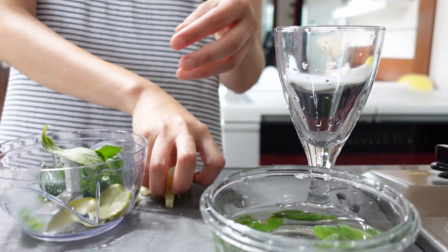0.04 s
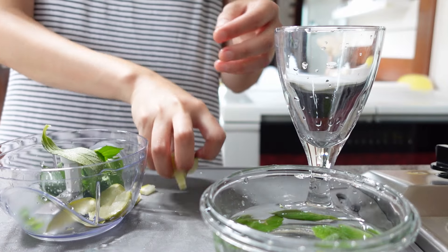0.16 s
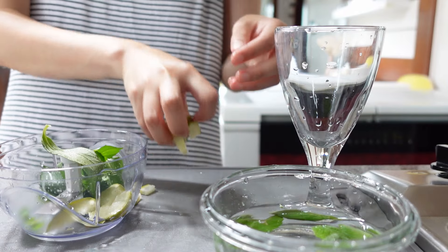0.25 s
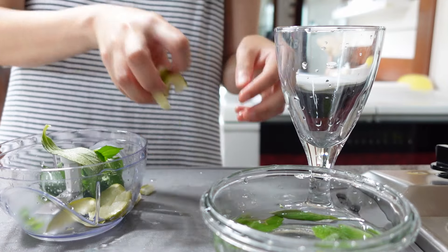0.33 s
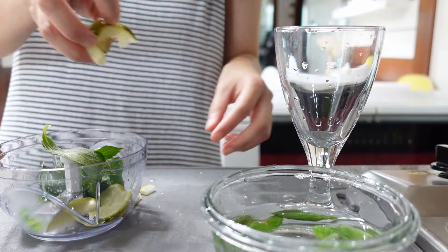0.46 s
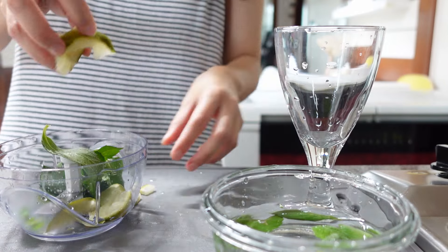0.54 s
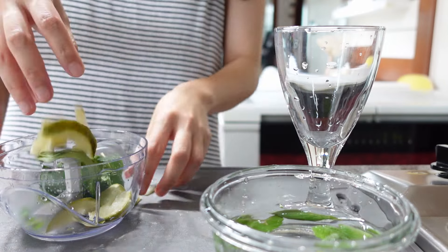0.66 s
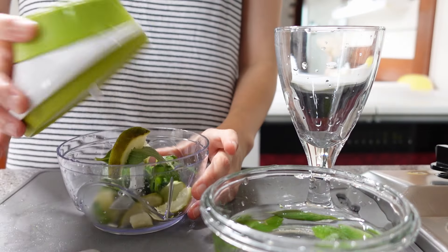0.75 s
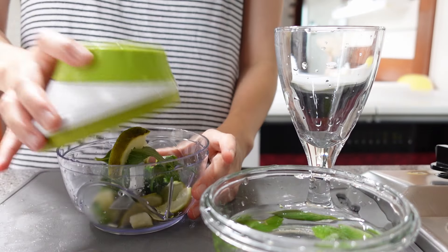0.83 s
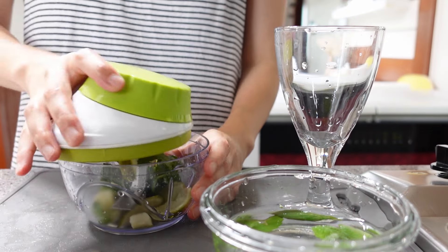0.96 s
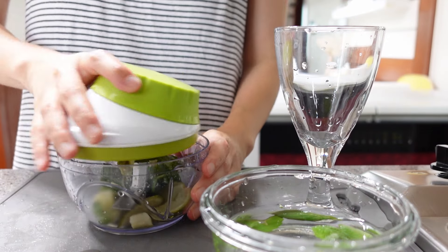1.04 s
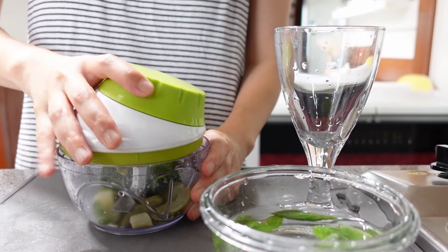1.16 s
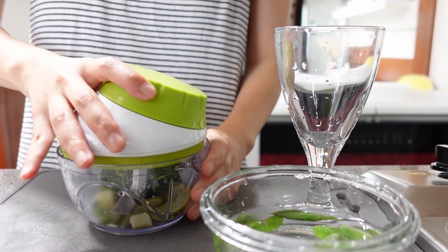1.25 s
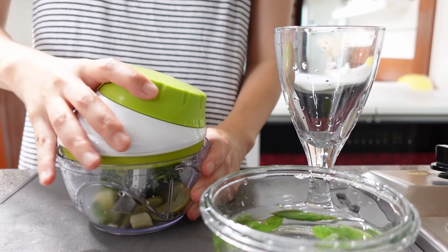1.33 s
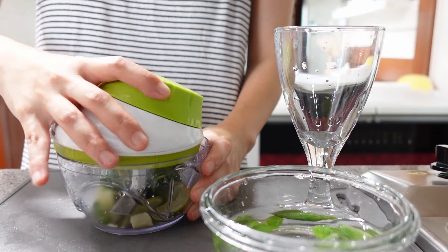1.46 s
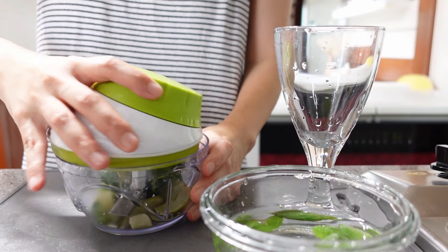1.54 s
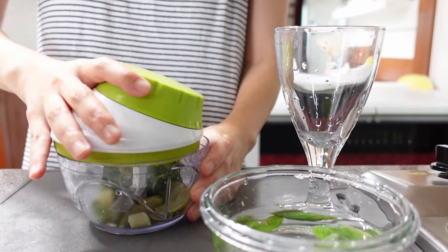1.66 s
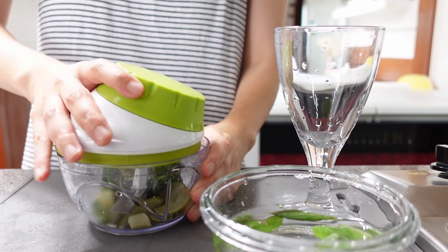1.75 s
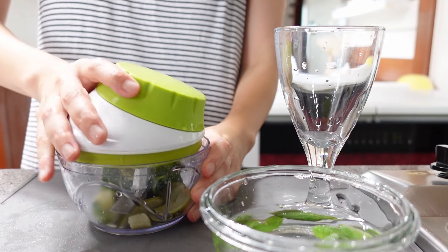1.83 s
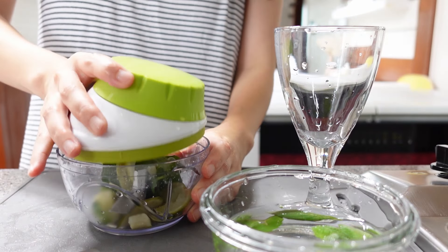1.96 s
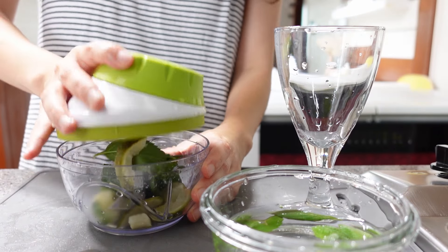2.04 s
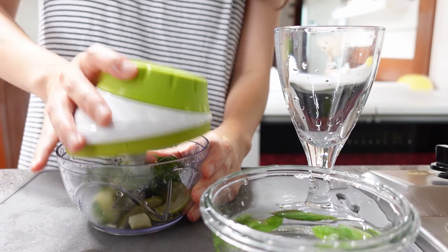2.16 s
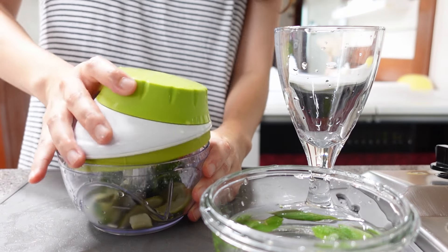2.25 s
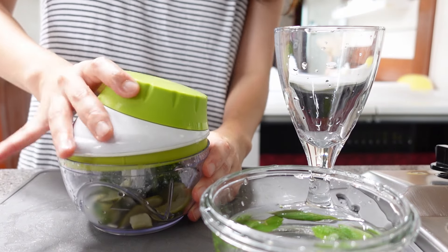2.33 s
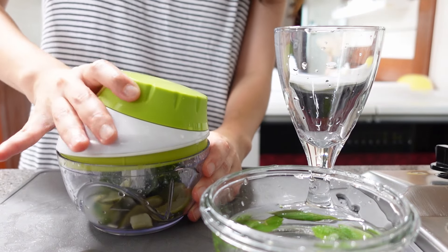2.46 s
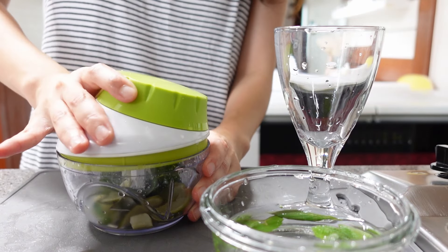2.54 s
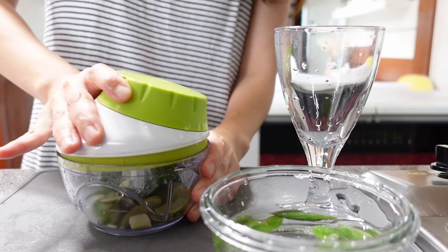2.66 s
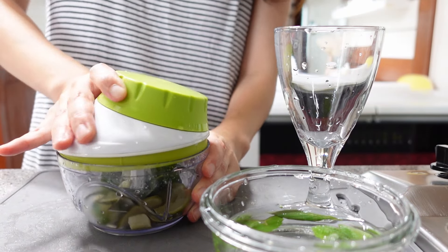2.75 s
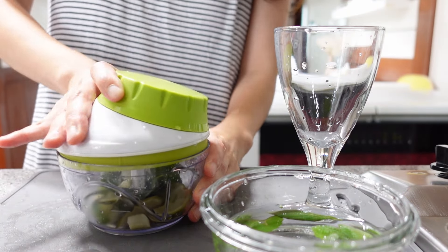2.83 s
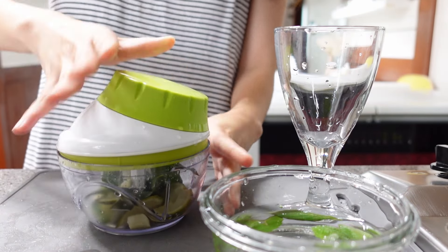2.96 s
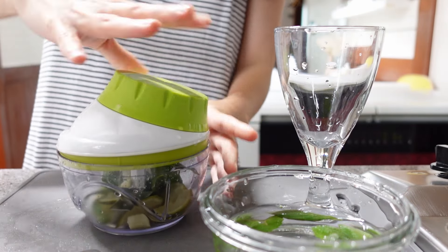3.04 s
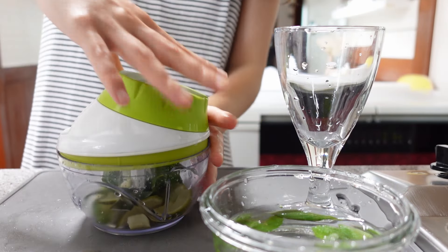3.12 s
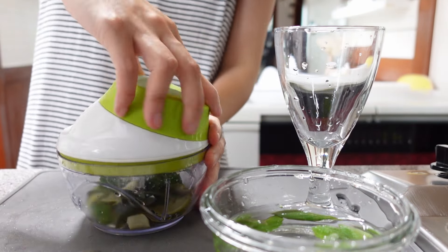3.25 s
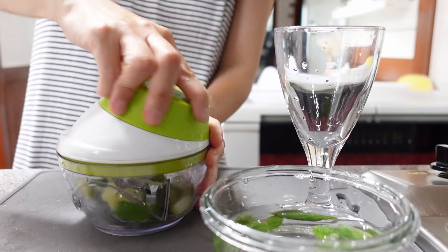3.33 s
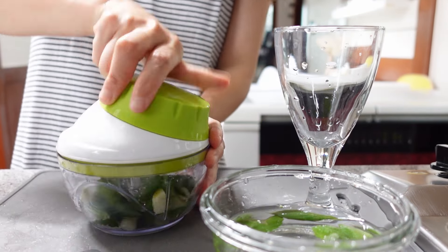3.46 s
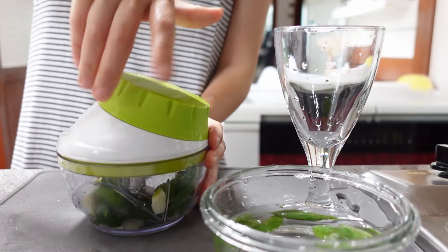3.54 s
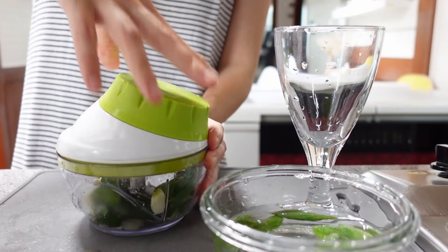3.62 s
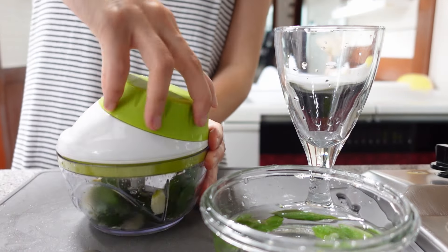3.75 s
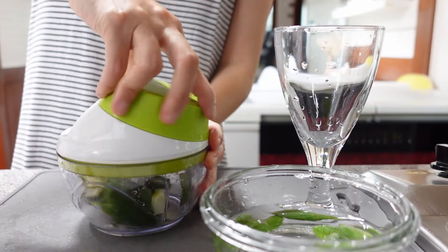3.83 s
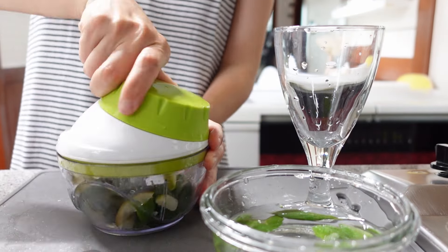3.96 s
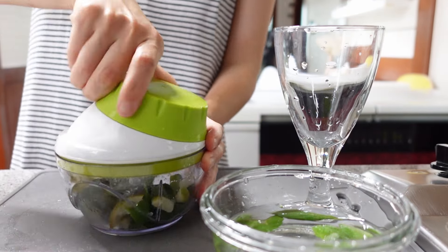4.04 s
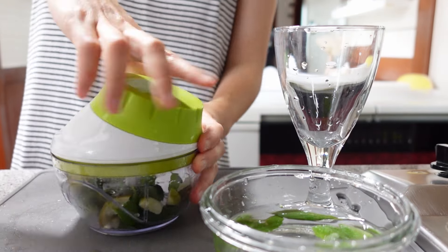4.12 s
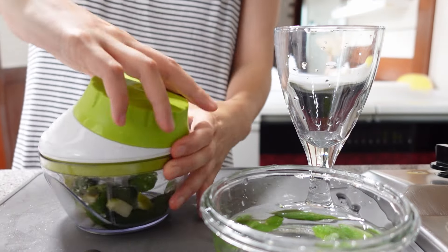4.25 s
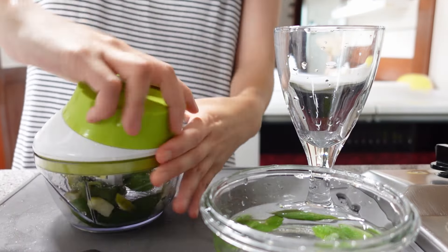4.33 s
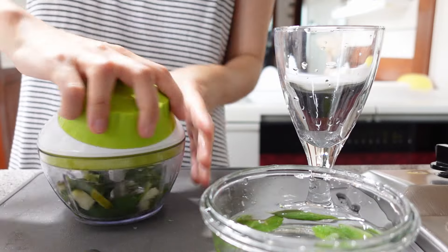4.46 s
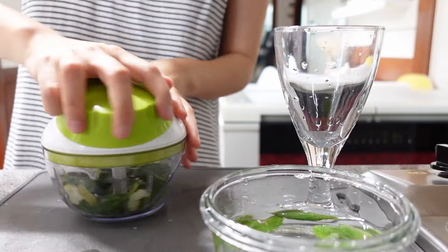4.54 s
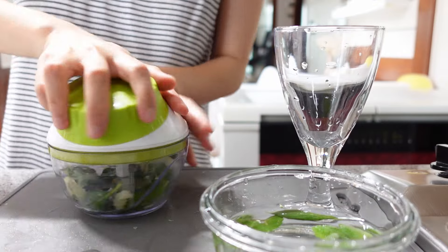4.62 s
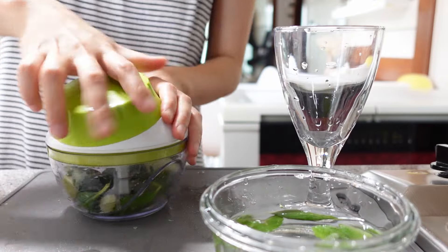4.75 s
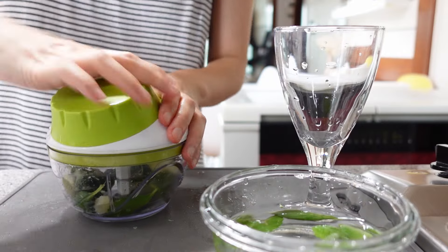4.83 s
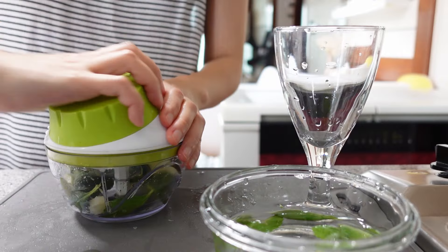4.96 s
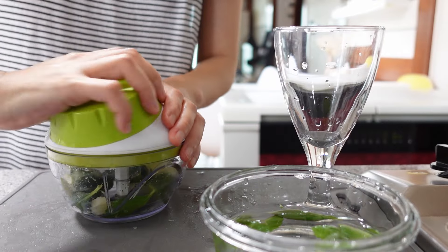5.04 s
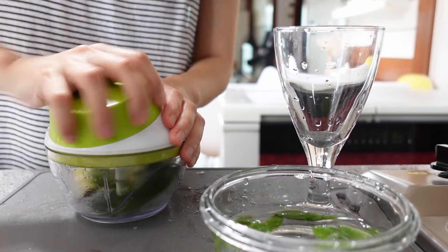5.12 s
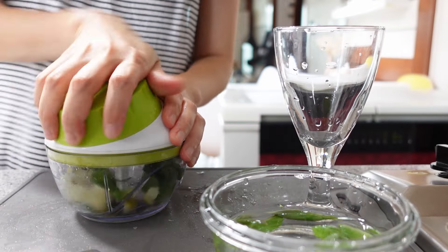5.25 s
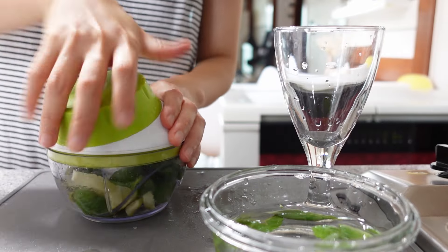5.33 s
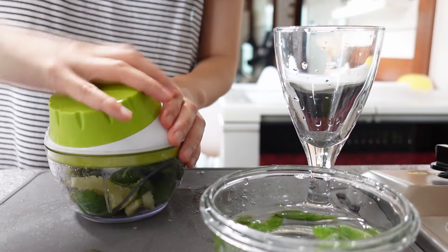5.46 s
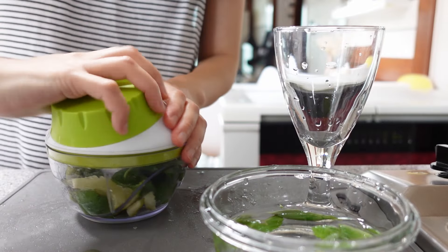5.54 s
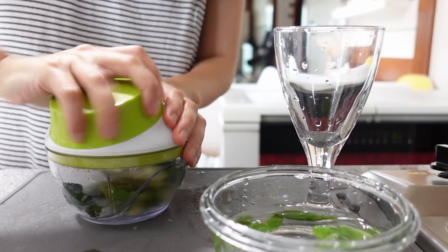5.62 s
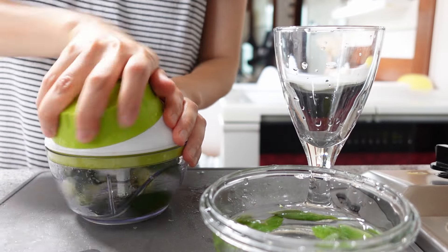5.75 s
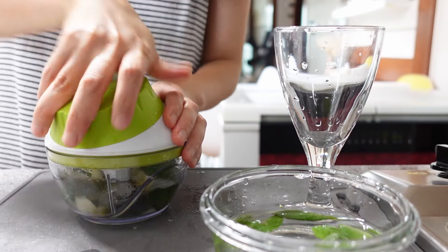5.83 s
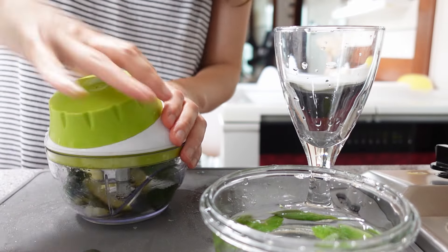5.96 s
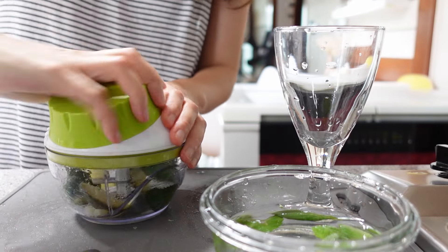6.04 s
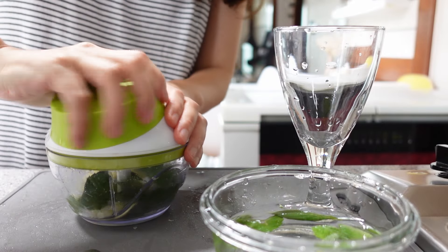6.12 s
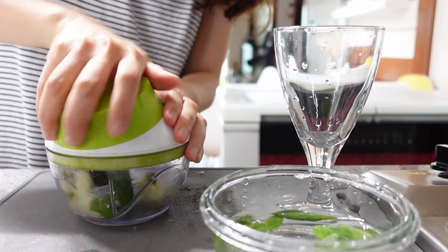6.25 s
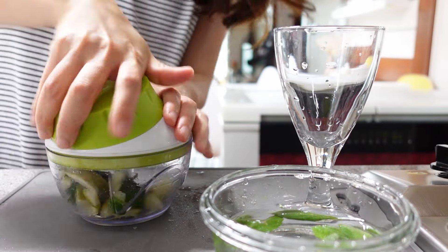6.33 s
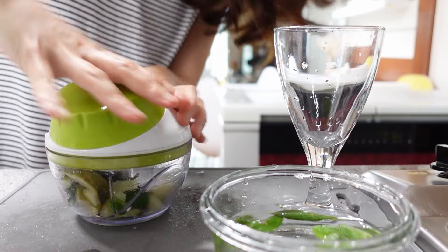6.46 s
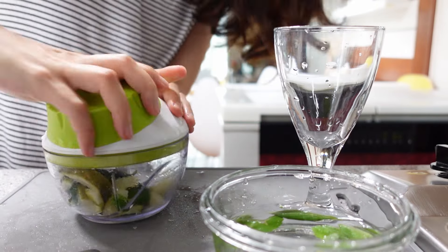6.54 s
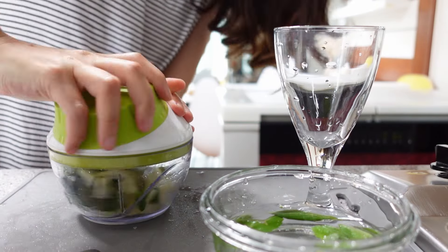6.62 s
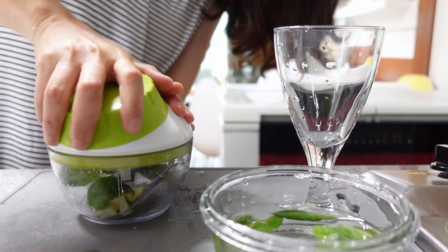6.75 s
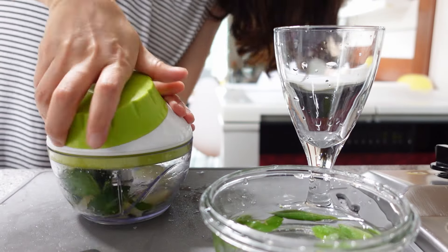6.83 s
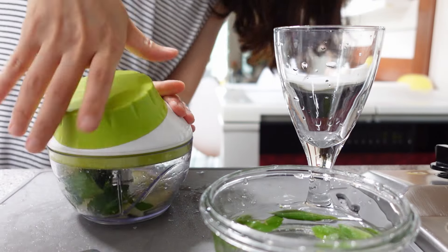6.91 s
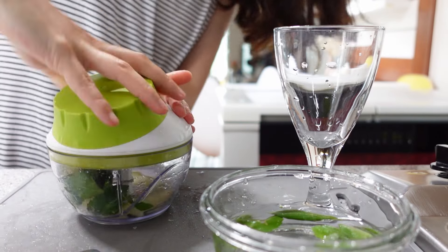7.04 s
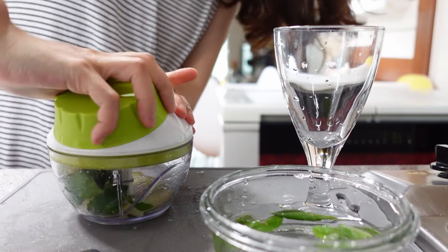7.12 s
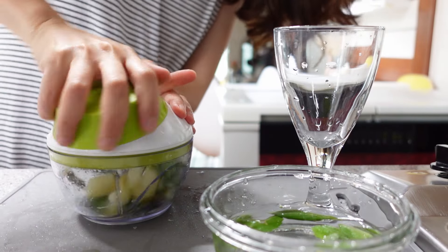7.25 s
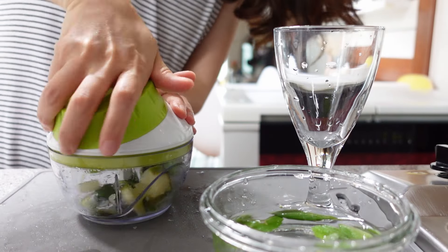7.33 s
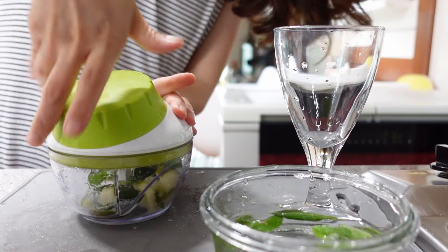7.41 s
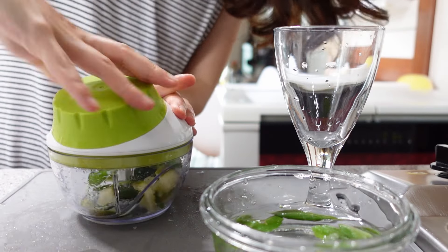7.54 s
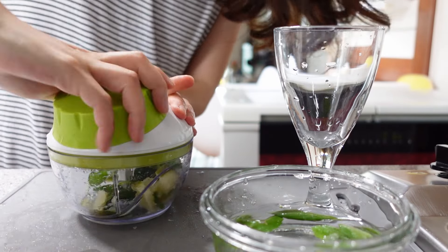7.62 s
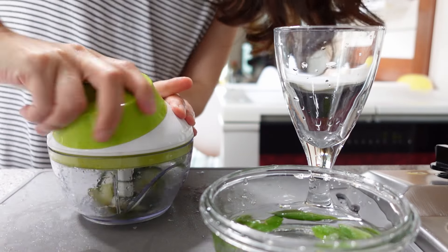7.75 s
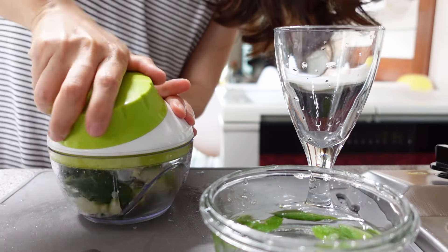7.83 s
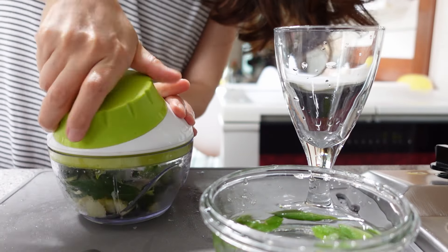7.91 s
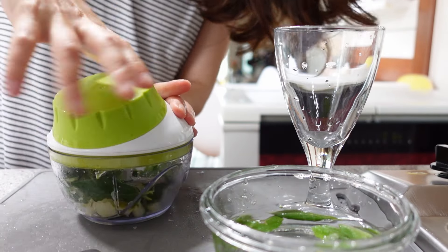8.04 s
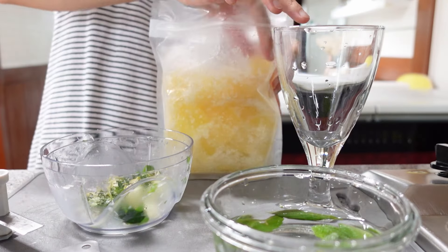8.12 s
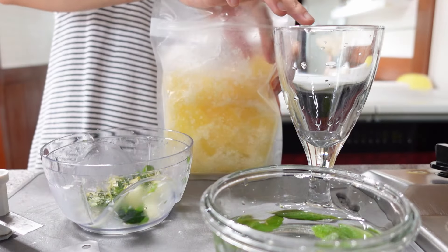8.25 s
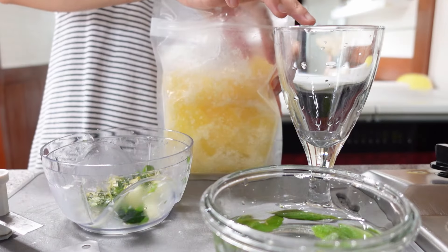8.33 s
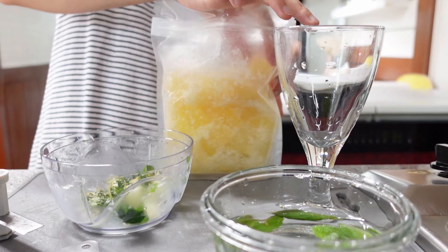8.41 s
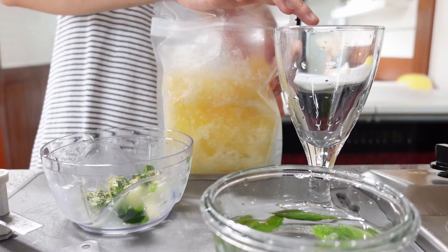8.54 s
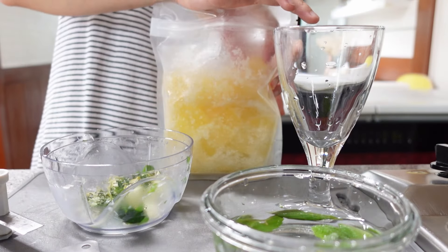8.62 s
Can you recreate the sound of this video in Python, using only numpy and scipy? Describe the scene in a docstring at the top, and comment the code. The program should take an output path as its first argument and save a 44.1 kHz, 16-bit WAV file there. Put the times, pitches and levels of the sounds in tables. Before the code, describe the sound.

In a small kitchen with a low fridge drone, leaves rustle very faintly and a plastic bowl lands on the counter, its sound cut short. A lid knocks, scrapes and snaps onto the bowl. Repeated twists then make gears clack and fruit tumble with dull thumps, until a frozen bag gives a sharp crack and small ticks. Close microphone, short room reverberation.

```python
"""Hand-turned plastic food chopper on a kitchen counter, over a fridge-like drone (shaped noise).
Hands rustle among leaves (noise), then the bowl is set down, its sound cut short. The lid knocks (struck modes),
scrapes (many small blows) and makes the rim sing (narrow-band noise) as it is fitted; the bowl rocks with thumps.
Twists of the cap make the gears knock (struck modes) and the fruit tumble (small blows).
At the end a stiff frozen bag cracks (very short struck contacts)."""
import sys
import numpy as np
from scipy import signal
from scipy.fft import rfft, irfft
from scipy.io import wavfile
from scipy.ndimage import uniform_filter1d

SR = 44100
rng = np.random.default_rng(int(sys.argv[2]) if len(sys.argv) > 2 else 0)


def wav_record(signal):
    """Record a signal, one row per channel, as 16-bit PCM in the file named by sys.argv[1]."""
    frames = np.transpose(np.atleast_2d(signal))
    bounded = np.clip(frames, -1, 1)
    # unit amplitude maps onto the largest positive 16-bit level
    quanta = np.round(bounded * 32767).astype(np.int16)
    wavfile.write(sys.argv[1], SR, quanta)


N = 382788

# fridge-like drone spectrum: (frequency [Hz], relative density [dB])
DRONE_SPECTRUM = [(66, -15.5), (82, 3.5), (100, -6.5), (125, 6.5), (160, -4), (300, -5.5), (700, -15.5),
                  (1500, -20), (2000, -21.5), (3000, -31), (6000, -39.5), (16000, -50.5)]
# drone course: (time [s], level [dB])
DRONE_LEVEL = [(0, -48), (.74, -47.5), (.76, -50.5), (1.4, -52), (8.1, -47), (8.15, -54), (8.68, -51.5)]
# drone and rustle width: (frequency [Hz], side over mid [dB])
NOISE_SIDE = [(60, -31), (240, -15), (950, -10), (3770, -7), (15000, -14)]
# hands among leaves: (time [s], level [dB])
RUSTLE_LEVEL = [(0.0, -66), (0.634, -77), (0.74, -51)]
# rustle spectrum: (frequency [Hz], relative density [dB])
RUSTLE_SPECTRUM = [(300, -32), (700, -7), (1150, 9), (1800, -15), (2800, 3), (7500, -13), (15000, -14)]
# reverberation of the kitchen: (frequency [Hz], t60 [s])
KITCHEN_T60 = [(150, 0.44), (400, 0.64), (1000, 0.52), (2800, 0.5), (7000, 0.5), (14000, 0.44)]
# gain of the room sound at the side: (frequency [Hz], gain [dB])
ROOM_SIDE = [(60, -59), (300, -18.5), (1000, -10.5), (4000, -5), (14000, -12)]

# lid knocking on the open bowl: (time [s], mid peak [dB], hardness [dB], contact [ms], pitch [Hz])
LID_KNOCKS = [(0.166, -45.5, 27.5, 2.4, 2030), (0.879, -19.5, -6, 12, 762), (0.91, -14, -3, 1.1, 680),
              (0.938, -38, -21, 1.2, 563), (0.944, -38, 19, 3.7, 2500), (1.084, -39, -10, 15, 800),
              (1.099, -32, 12, 9, 1960), (1.485, -45, 19, 2.3, 740), (1.66, -35, 0.5, 4.7, 700),
              (2.005, -31.5, -10, 1.5, 697), (2.013, -24.5, 6.5, 11, 820), (2.017, -31, 4, 9.6, 2050),
              (2.207, -10, 2, 8.8, 640), (2.223, -11, 9, 11.5, 654), (2.239, -13.5, 1.5, 12, 500),
              (2.26, -19.5, 5, 9.2, 570), (2.275, -25, 5, 13, 690), (2.315, -29, 28.5, 10, 2220),
              (2.345, -22.5, 29.5, 2.3, 2670), (2.349, -7.5, 8.5, 4.9, 1790), (2.353, -12.5, -1, 1.6, 1320),
              (2.508, -39.5, -11, 4.2, 540), (2.644, -32.5, 14, 4.8, 1370), (2.731, -34, -10.5, 7, 1310),
              (2.89, -40, -9.5, 97, 685)]
# bowl set down on the counter, chattering to rest: (time [s], mid peak [dB], hardness [dB], pitch [Hz])
SET_DOWN = [(0.7125, -17, 3, 725), (0.7155, -17, 0, 1160), (0.72, -27.5, 4, 2370), (0.737, -31, 12, 1130)]
# lid rim scraping: (start [s], push [s], mid at start [dB], mid at end of push [dB], hardness [dB])
SCRAPES = [(0.877, 0.035, -67, -35, -3.5), (1.03, 0.054, -63, -42, 1.5), (1.22, 0.045, -63, -55.5, 1.5),
           (1.44, 0.036, -60, -55, -5), (1.959, 0.045, -54.5, -61, -5), (2.03, 0.039, -60, -56, 1),
           (2.22, 0.1, -48, -34.5, 0.5)]
# lid slides that make the rim sing: (start [s], push [s], start level [dB], end of push level [dB], pitch [Hz])
SLIDES = [(1.083, 0.011, -36.5, -28, 727), (1.096, 0.015, -47, -45, 1970), (1.103, 0.01, -42, -49, 3320),
          (1.45, 0.043, -65, -55, 1944), (2.013, 0.14, -47, -70, 1980), (2.013, 0.13, -54.5, -66, 2690),
          (2.22, 0.03, -39, -39, 1943)]
# bowl rocking on the counter: (time [s], level before the pulse shape [dB])
THUMPS = [(2.35, -27), (3.938, -22.5), (4.65, -30), (5.677, -35.5), (6.17, -23.5), (6.617, -24)]
# gears and blade knocking in the shut bowl: (time [s], mid peak [dB], hardness [dB], pitch [Hz])
GEAR_KNOCKS = [(3.148, -28, -15, 720), (3.226, -40, -23, 823), (3.236, -20, -34, 775),
               (3.344, -27.5, -1, 1170), (3.413, -39.5, 1, 1040), (3.572, -32, -28, 780),
               (3.694, -31.5, -31, 720), (3.715, -32.5, -4.5, 1830), (3.76, -27.5, -20, 830),
               (3.885, -26.5, -36, 760), (3.939, -32.5, -13, 856), (4.087, -22, -11, 1440),
               (4.104, -23, -11, 770), (4.131, -19, -7.5, 875), (4.3, -32.5, -24, 820),
               (4.352, -34, -24, 1520), (4.365, -28, -13, 730), (4.477, -41, -4.5, 1960),
               (4.701, -29.5, -27, 710), (4.778, -30, -28, 750), (4.996, -24, -7, 810),
               (5.02, -25, -9, 1480), (5.09, -20.5, -6, 1830), (5.1, -19.5, -5.5, 2690),
               (5.11, -17, -19, 1210), (5.13, -20.5, -8, 751), (5.177, -26, -11, 760),
               (5.2, -26.5, -17, 726), (5.256, -21, -3.5, 724), (5.265, -30.5, -16, 760),
               (5.287, -33, -0.5, 1330), (5.368, -29.5, -21, 1260), (5.383, -20, -8.5, 890),
               (5.487, -20.5, -7, 2870), (5.491, -18.5, -9.5, 1410), (5.499, -25, -24, 1170),
               (5.576, -29, -10, 751), (5.6, -21.5, -10.5, 1240), (5.736, -28, -1.5, 1180),
               (5.902, -31.5, -29, 1420), (5.928, -24.5, -18, 770), (6.018, -21, -13, 1230),
               (6.085, -32.5, -5, 3000), (6.101, -25.5, -10, 1030), (6.114, -21, -7.5, 2380),
               (6.121, -18, -9.5, 1400), (6.197, -23.5, -12, 2590), (6.205, -26.5, -6, 1190),
               (6.225, -21, -6, 781), (6.371, -29.5, -28, 1390), (6.497, -26.5, -9.5, 790),
               (6.53, -16, -9.5, 770), (6.593, -23.5, -10, 751), (6.616, -16.5, -7, 2900),
               (6.766, -29, -10, 1370), (6.797, -48, 7, 4400), (6.845, -33.5, -4, 2000),
               (6.871, -21, -7, 1200), (6.926, -24.5, -10, 1280), (6.934, -26.5, -24, 1280),
               (7.069, -25, -10, 802), (7.079, -22, -7, 796), (7.112, -35, -28, 860),
               (7.135, -22.5, -11, 1190), (7.46, -21.5, -7, 820), (7.583, -22.5, -21, 786),
               (7.598, -21, -7, 1440), (7.638, -21.5, -13, 875), (7.686, -23.5, -9.5, 1070),
               (7.792, -26, -15, 770), (7.929, -36.5, -3.5, 970), (8.011, -23.5, -6.5, 840)]
# twists spinning the blade in fruit: (start [s], push [s], mid at start [dB], mid at end of push [dB], hardness [dB])
TWISTS = [(3.173, 0.27, -46.5, -38, -3), (3.842, 0.055, -46.5, -37, -1.5), (4.605, 0.14, -54, -53.5, -10.5),
          (5.11, 0.14, -43, -42, 1), (5.554, 0.17, -51, -37.5, -0.5), (6.16, 0.072, -48, -39.5, 2),
          (6.682, 0.046, -53, -41, 3), (7.229, 0.035, -36.5, -34, -1), (7.759, 0.053, -44, -37.5, 0)]
# fruit jolting as the cap is gripped or clicks back: (time [s], length [s], mid [dB], hardness [dB])
JOLTS = [(3.696, 0.035, -44, -3.5), (4.087, 0.031, -41.5, -4), (4.32, 0.053, -49, 9),
         (5.006, 0.025, -43, 6), (5.386, 0.0049, -41, 0.5), (5.492, 0.006, -39.5, -3),
         (5.912, 0.016, -46, -1), (6.087, 0.084, -41, 0), (6.508, 0.016, -36, 8), (6.605, 0.034, -45, -5.5),
         (6.922, 0.017, -43.5, 17), (7.07, 0.044, -40, 11), (7.458, 0.011, -42.5, -4),
         (7.58, 0.026, -37, 2), (8.011, 0.0061, -42, -4.5)]
# cracks and taps of the bag: (time [s], mid peak [dB], hardness [dB], pitch [Hz])
BAG_CRACKS = [(8.117, -30.5, -3, 950), (8.126, -15, 2.5, 1170), (8.185, -52, 23, 4250),
              (8.192, -34.5, 16, 6600), (8.196, -30.5, -12, 640), (8.217, -33.5, -12, 905),
              (8.29, -40, -22, 517), (8.34, -39.5, -35, 590), (8.418, -29.5, 16, 4770),
              (8.473, -28.5, 18, 4470)]

# modes of the open bowl: (frequency [Hz], level [dB])
OPEN_BOWL = [(300, -6.5), (490, -2), (690, -11), (800, 2.5), (1150, -6.5), (1945, -8.5), (2720, -7.5),
             (3330, -17)]
# modes of the bowl standing on the counter: (frequency [Hz], level [dB])
STANDING_BOWL = [(220, -2), (400, 2), (705, -0.5), (1130, -2), (2040, -2), (2370, -18)]
# modes of the shut bowl: (frequency [Hz], level [dB])
SHUT_BOWL = [(200, 17), (300, 23.6), (500, 14.6), (800, 2.8), (1100, 2.2), (1440, 6.1), (2050, 6.4),
             (2950, 9.9), (4400, 13.6), (6000, 6.8)]
# modes of the frozen bag: (frequency [Hz], level [dB])
BAG = [(640, -6), (1150, -0.5), (3150, 1.5), (4200, -1), (4800, 2.5), (6600, -3), (9800, 0)]

# hardness rules: (thud over mid [dB], thud lost per dB, edge over mid [dB], edge won per dB)
LID_TONE, SET_DOWN_TONE = (-8.5, 1.34, -27, 1.15), (-7.0, 1, -18, -1.7)
GEAR_TONE, BAG_TONE = (-20.5, 0.5775, -0.5, 2.03), (-22.5, 0.6726, -3, 1.38)
SCRAPE_TONE, TWIST_TONE, JOLT_TONE = (-4.5, 2, -16.5, 3), (-1.5, 1.13, -12, 2.2), (-12.5, 3.5, -29.5, 0.84)

SET_DOWN_CONTACT_MS, BAG_CONTACT_MS = 1.5, 0.13
GEAR_CONTACT_MS = (1.88, 12)  # range of a uniform draw
ONSET_DB_PER_S, QUICK_ONSET_DB_PER_S = 515, 2200
SCRAPE_FALL_DB_PER_S, TWIST_FALL_DB_PER_S = 246, 147
JOLT_FALL_DB_PER_S, SLIDE_FALL_DB_PER_S = 264, 1200
RIM_WIDTH_HZ = 30
HUSH_S = .742  # the set-down and its room sound stop here
CEILING, EDGE_HZ = .33, 15900


def amp(db):
    """Amplitude factor of a level in dB."""
    return 10 ** (np.asarray(db) / 20)


def evened(x):
    """Scales to unit RMS."""
    return x / np.sqrt(np.mean(x ** 2) + 1e-20)


def read(points, hz):
    """Interpolates a table over log frequency."""
    f, value = np.transpose(points)
    return np.interp(np.log(hz + 1), np.log(f + 1), value)


def along(rows):
    """Level curve [dB] at every sample, -130 dB outside it."""
    return np.interp(np.arange(N) / SR, *np.transpose(rows), -130, -130)


def add(mix, s, sound):
    """Adds a sound in place at a time [s]."""
    part = mix[round(s * SR):][:len(sound)]
    part += sound[:len(part)]


def coloured(x, points):
    """Filters by a gain table, zero phase."""
    return irfft(rfft(x) * amp(read(points, np.fft.rfftfreq(N, 1 / SR))), N)


def bands(x, high_hz, low_hz=500):
    """Splits into thud (less its deepest bass), mid and edge."""
    hz = np.fft.rfftfreq(x.shape[-1], 1 / SR) + 1
    low = 1 / (1 + (hz / low_hz) ** 4)
    high = 1 / (1 + (high_hz / hz) ** 4)
    deep_cut = 1 / (1 + (150 / hz) ** 4)
    gains = (low * deep_cut, (1 - low) * (1 - high), high)
    return [irfft(rfft(x) * gain, x.shape[-1]) for gain in gains]


def tone(rule, hard_db):
    """Thud, mid and edge levels [dB] for a given hardness."""
    thud_db, softer, edge_db, sharper = rule
    return np.array([thud_db - softer * hard_db, 0, edge_db + sharper * hard_db])


def rings(modes, count, turns, click_db, click_hz, detune, place_db):
    """Struck responses at several places: damped modes, weighed and detuned by place, over a dry click.
    A mode falls 60 dB in turns / (hz + 400) seconds, so low modes ring for fewer cycles."""
    t = np.arange(4096) / SR
    hz, db = np.transpose(modes)[:, :, None]
    chance = rng.standard_normal((count, len(modes), 2))
    envelope = amp(db + place_db * chance[..., :1] - 60 * t * (hz + 400) / turns)
    mode_hz = hz * (1 + detune * chance[..., 1:])
    tones = (envelope * np.sin(2 * np.pi * mode_hz * t)).sum(1)
    click = signal.lfilter(*signal.butter(3, click_hz, fs=SR), t == 0)
    return np.roll(tones + amp(click_db) * click, 512, 1)  # lead of 512 samples


def knocks(rows, contact_ms, rule, modes, turns, click_db, click_hz, edge_hz,
           touch=2.7, pitch_db=11.0, sharpness=8.5, detune=0.01, place_db=4.0):
    """A first touch and a short rough contact set the object ringing; each blow stresses one pitch."""
    out, t = np.zeros(N), np.arange(1024) / SR
    grit = rng.standard_normal((len(rows), len(t))) ** 3 + touch * (t == 0)
    struck = rings(modes, len(rows), turns, click_db, click_hz, detune, place_db)
    contacts = contact_ms * np.ones(len(rows))
    for (s, db, hard_db, hz), ms, ring, g in zip(rows, contacts, struck, grit):
        blow = signal.fftconvolve(ring, g * np.exp(-t * 1000 / ms))
        stressed = signal.lfilter(*signal.iirpeak(hz, sharpness, SR), blow)
        blow = blow + amp(pitch_db) * stressed
        parts = []
        for band_db, part in zip(tone(rule, hard_db), bands(blow, edge_hz)):
            peak = abs(signal.hilbert(part)).max()
            parts.append(amp(band_db) * part / peak)
        add(out, s - 512 / SR, amp(db) * sum(parts))
    return out


def stroke(start, push, start_db, end_db, tone_db, fall_db_per_s, rise_db_per_s=ONSET_DB_PER_S):
    """Band gains of one stroke: steep onset, straight dB course over the push, then decay."""
    t = np.arange(N) / SR - start
    db = np.interp(t, [0, push], [start_db, end_db])
    db += rise_db_per_s * np.minimum(t, 0) - fall_db_per_s * np.maximum(t - push, 0)
    return amp(tone_db)[:, None] * amp(db)


def rattle(gains, modes, turns, click_db, click_hz, per_s, spread_db, rub, detune, place_db):
    """Many small random blows of uneven size over a smooth rub, their strength following the stroke."""
    places, clump_db = 12, 5.0
    size = amp(spread_db * np.minimum(rng.exponential(1, N), 2.3)) * (rng.random(N) < per_s / SR)
    size = size * rng.choice([-1, 1], N) + rub * rng.standard_normal(N)
    # pieces catch in bunches some milliseconds long, each place at its own times
    drift = uniform_filter1d(uniform_filter1d(rng.standard_normal(N), size=250), size=250)
    clumps = amp(clump_db * evened(drift))
    place, shift = rng.integers(0, places, N), rng.integers(0, N, places)
    # no blow is instant: 0.4 ms rough contact
    contact = rng.standard_normal((places, 128)) * np.exp(-np.arange(128) / SR / .0004)
    struck = rings(modes, places, turns, click_db, click_hz, detune, place_db)
    shapes = signal.fftconvolve(struck, contact, axes=1)
    x = np.zeros(N)
    for k, shape in enumerate(shapes):
        blows = size * (place == k) * np.roll(clumps, shift[k])
        x += signal.oaconvolve(blows, shape)[512:N + 512]
    return sum(gain * evened(part) for gain, part in zip(gains, bands(x, 2820.0)))


def noise(spectrum_db, patch_db):
    """Random short-time spectra in two separately drawn channels that share drifting patches."""
    a, b, patches = rng.standard_normal((N // 512 + 5, 1025, 2, 3)).T
    patches = evened(uniform_filter1d(uniform_filter1d(patches[0], 20, 0), 6, 1))
    z = (a + 1j * b) * amp(spectrum_db[:, None] + patch_db * patches)
    return evened(signal.istft(z, nperseg=2048, noverlap=1536)[1][:, :N])


def kitchen(x):
    """Sparse taps of random sign, strong at first off the counter and the bowls nearby, each band then dying
    at its own speed; three tails take turns."""
    out, turn = np.zeros((2, N)), np.arange(N) * 2 * np.pi * 3.0 / SR
    length, gap = SR // 2, 20
    for k in range(3):
        taps = np.zeros((2, length))
        at = np.arange(gap, length - gap, gap) + rng.integers(0, gap, (2, (length - gap - 1) // gap))
        np.put_along_axis(taps, at, rng.choice([-1., 1.], at.shape), 1)
        taps *= 1 + 3.27 * np.exp(-np.arange(length) / SR / 0.0095)
        hz, t, z = signal.stft(taps, SR, nperseg=256)
        decay = amp(-60 * t / read(KITCHEN_T60, hz)[:, None])
        tail = signal.istft(z * decay, SR, nperseg=256)[1]
        fed = x * np.sqrt(2 / 3) * np.cos(turn + k * np.pi / 3)
        out += signal.oaconvolve(fed[None], tail / np.linalg.norm(tail[0]), axes=1)[:, :N]
    return out


def heard(x, room_db):
    """Direct sound in the middle, the room in the middle and at the side."""
    wet = kitchen(x)
    return np.array([x + amp(room_db) * wet[0], amp(room_db) * wet[1]])


def fridge_drone():
    """Steady low-heavy noise following the level course."""
    spectrum_db = read(DRONE_SPECTRUM, np.fft.rfftfreq(2048, 1 / SR))
    return amp(along(DRONE_LEVEL)) * noise(spectrum_db, patch_db=1.2)


def leaf_rustle():
    """Patchy noise of hands among leaves."""
    spectrum_db = read(RUSTLE_SPECTRUM, np.fft.rfftfreq(2048, 1 / SR))
    return amp(along(RUSTLE_LEVEL)) * noise(spectrum_db, patch_db=3.0)


def lid_knocks():
    """The lid strikes the open bowl and excites its modes."""
    rows = np.array(LID_KNOCKS)
    return knocks(rows[:, [0, 1, 2, 4]], rows[:, 3], LID_TONE, OPEN_BOWL, turns=9.3,
                  click_db=26.5, click_hz=6400, edge_hz=3400, detune=0.0081)


def set_down():
    """The bowl meets the counter in a few close blows."""
    return knocks(SET_DOWN, SET_DOWN_CONTACT_MS, SET_DOWN_TONE, STANDING_BOWL, turns=15,
                  click_db=14.0, click_hz=4960, edge_hz=2900, touch=2.5, pitch_db=10.0,
                  sharpness=2.4, place_db=-4.5)


def scrapes():
    """The rim of the lid drags on the open bowl in many small blows."""
    gains = sum(stroke(*row, tone(SCRAPE_TONE, hard_db), SCRAPE_FALL_DB_PER_S)
                for *row, hard_db in SCRAPES)
    return rattle(gains, OPEN_BOWL, 26.0, 21.0, click_hz=5650, per_s=1700, spread_db=-5.0,
                  rub=0.19, detune=0.017, place_db=4.5)


def rim():
    """A steady rub keeps a narrow mode of the rim ringing through each slide."""
    rub, out = rng.standard_normal(N), np.zeros(N)
    for *row, hz in SLIDES:
        mode = evened(signal.lfilter(*signal.iirpeak(hz, hz / RIM_WIDTH_HZ, SR), rub))
        gain = stroke(*row, np.zeros(1), SLIDE_FALL_DB_PER_S, QUICK_ONSET_DB_PER_S)[0]
        out += mode * gain
    return out


def thumps():
    """A slow push on the counter top's lowest mode, 118 Hz."""
    out, t = np.zeros(N), np.arange(8000) / SR
    pulse = 2.3 * t / 0.022 * np.exp(-t / 0.012) * np.sin(2 * np.pi * 118 * t)
    for s, db in THUMPS:
        add(out, s, amp(db) * pulse)
    return out


def gear_knocks():
    """Gears and blade strike inside the shut bowl, each contact of random length."""
    contact_ms = rng.uniform(*GEAR_CONTACT_MS, size=len(GEAR_KNOCKS))
    return knocks(GEAR_KNOCKS, contact_ms, GEAR_TONE, SHUT_BOWL, turns=17.0, click_db=32.5,
                  click_hz=6000, edge_hz=3010, touch=5.9, pitch_db=6.0, sharpness=3.7)


def fruit():
    """Pieces tumble and are cut in each twist and jump at each jolt, as small blows on the shut bowl."""
    twists = sum(stroke(*row, tone(TWIST_TONE, hard_db), TWIST_FALL_DB_PER_S)
                 for *row, hard_db in TWISTS)
    jolts = sum(stroke(s, length, db, db, tone(JOLT_TONE, hard_db), JOLT_FALL_DB_PER_S, QUICK_ONSET_DB_PER_S)
                for s, length, db, hard_db in JOLTS)
    return rattle(twists + jolts, SHUT_BOWL, 13.2, 33.3, click_hz=7200, per_s=450, spread_db=5.0,
                  rub=0.19, detune=0.07, place_db=5.0)


def bag_cracks():
    """The stiff bag snaps: very short contacts on widely varying modes."""
    return knocks(BAG_CRACKS, BAG_CONTACT_MS, BAG_TONE, BAG, turns=7.3, click_db=22.0, click_hz=8450,
                  edge_hz=1930, pitch_db=-2.0, sharpness=5.1, place_db=15.5)


def scene():
    """Sums the sources as mid and side, returns left and right."""
    first = np.arange(N) < HUSH_S * SR
    background = fridge_drone() + leaf_rustle()
    lid = lid_knocks() + scrapes() + rim()
    chopper = lid * ~first + gear_knocks() + fruit() + thumps()
    near = heard(lid * first + set_down(), -6.0) * first  # cuts the room tail too
    near += heard(chopper, -8.0)
    near += heard(bag_cracks(), 0.27)
    mid = near[0] + background[0]
    side = coloured(near[1], ROOM_SIDE) + coloured(background[1], NOISE_SIDE)
    return np.array([mid + side, mid - side])


def record(dry):
    """The microphone drops the deep bass and rounds off the loudest peaks; then the band limit."""
    thin = signal.sosfilt(signal.butter(2, 60, "high", fs=SR, output="sos"), dry)
    rounded = thin / (1 + (abs(thin) / CEILING) ** 4) ** .25
    lowpass = signal.firwin(511, EDGE_HZ, window=("kaiser", 9), fs=SR)
    return signal.oaconvolve(rounded, lowpass[None], "same")


dry = scene()
out = record(dry)
wav_record(out)
```